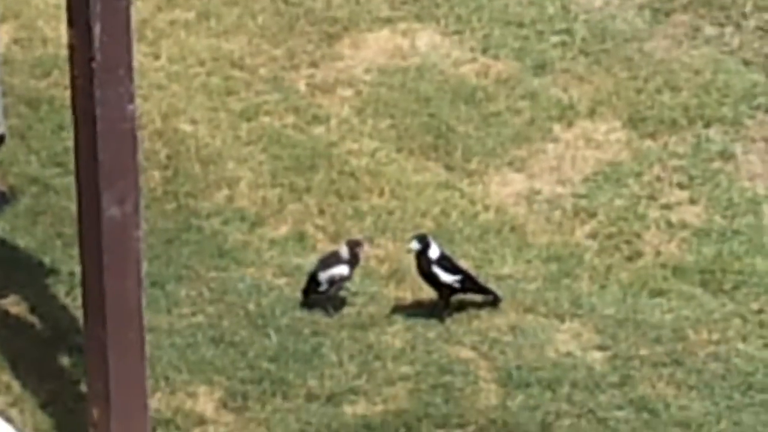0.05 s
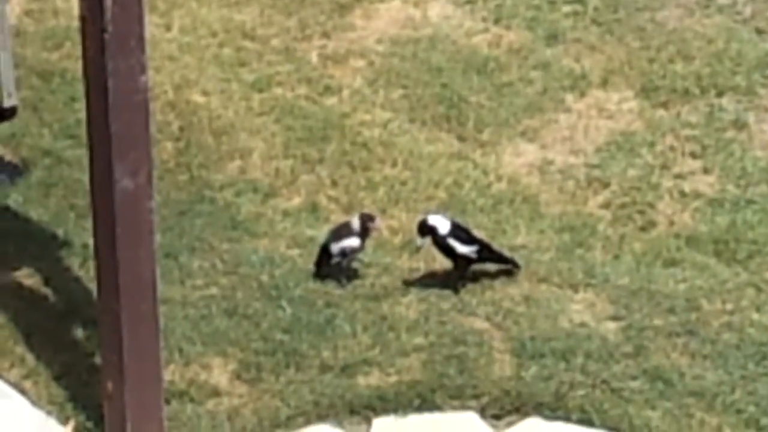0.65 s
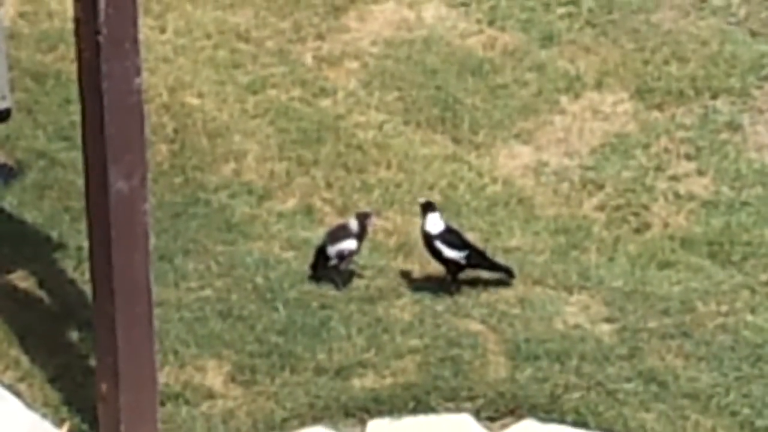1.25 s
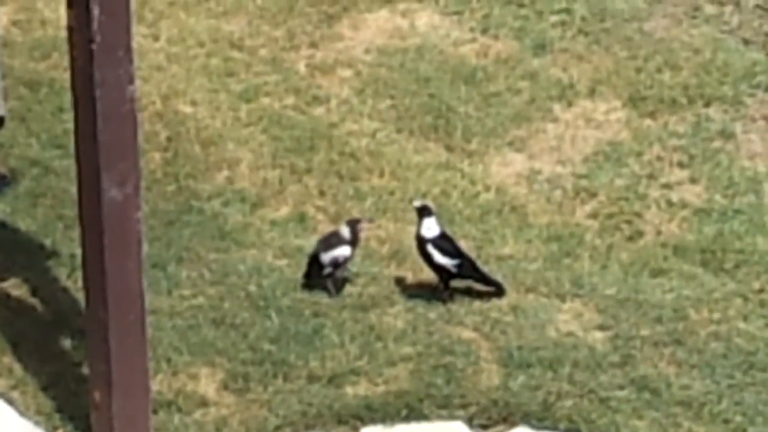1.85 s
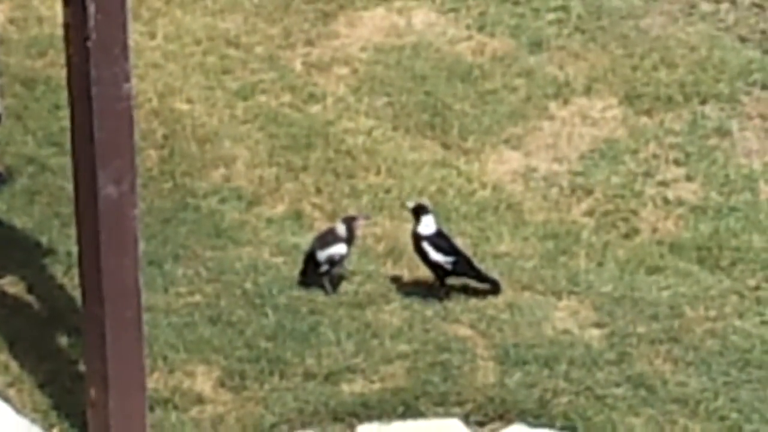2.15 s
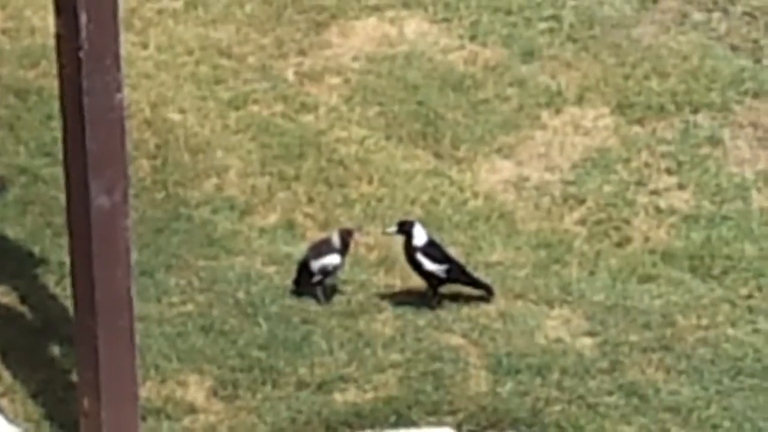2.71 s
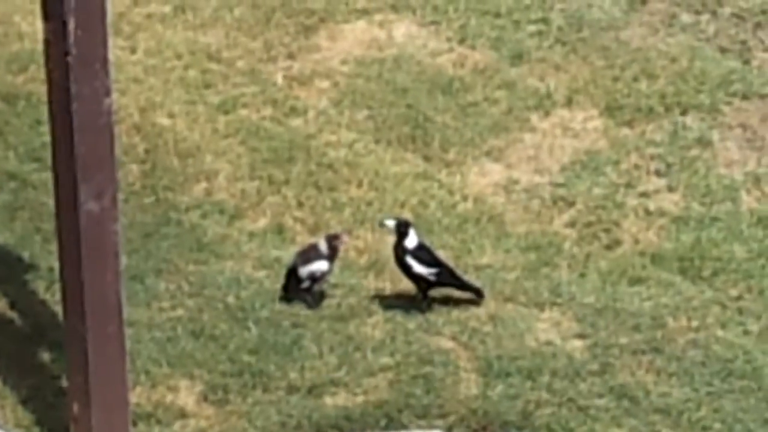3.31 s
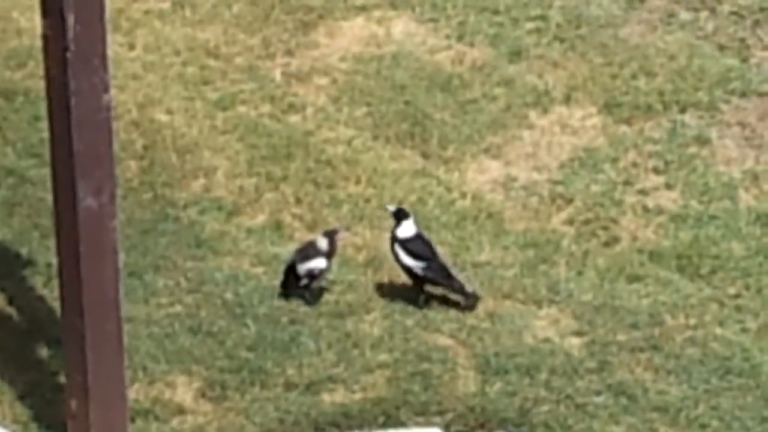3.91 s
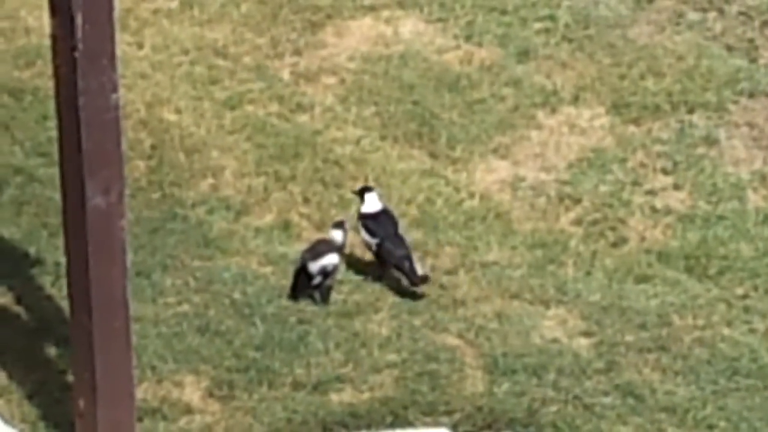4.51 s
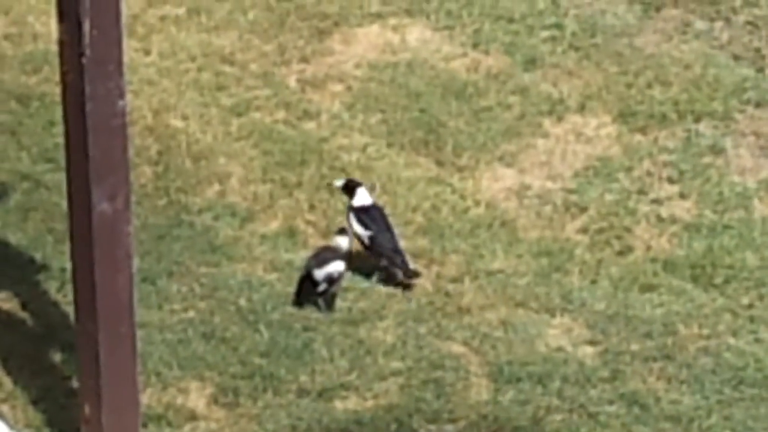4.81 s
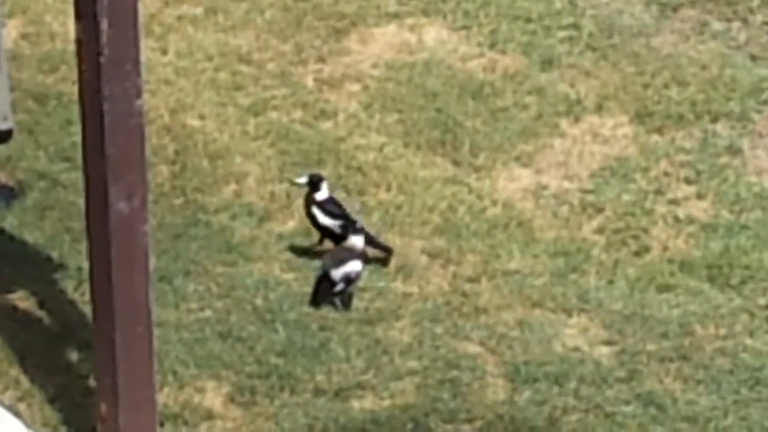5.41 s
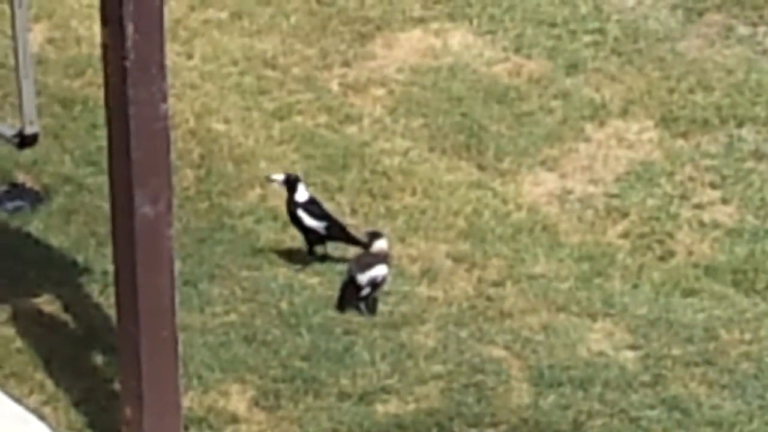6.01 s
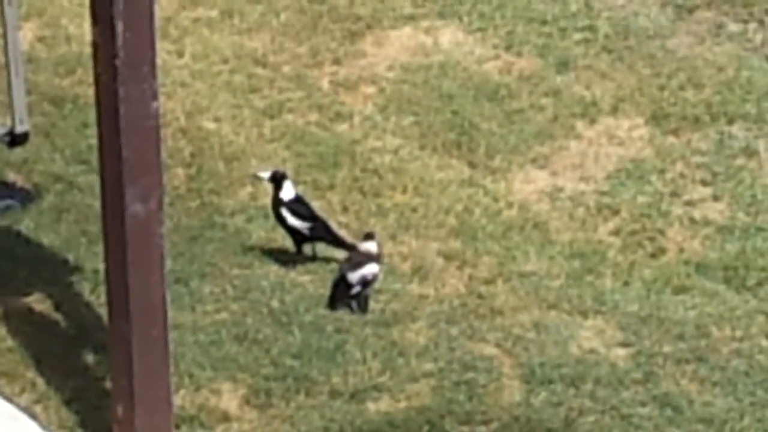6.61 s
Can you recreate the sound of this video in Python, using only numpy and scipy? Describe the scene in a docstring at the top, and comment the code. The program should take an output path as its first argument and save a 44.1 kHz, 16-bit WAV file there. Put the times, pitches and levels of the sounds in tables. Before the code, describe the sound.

Magpies give a run of short, nasal, rising begging whines in a backyard, with faint small birds and distant traffic hum.

```python
"""Young magpies begging on a back lawn

Each call is a nasal, climbing whine: harmonics from the syrinx, shaped by throat and beak, with air
pulsing in step. Two come from straight ahead, six from close on the right, five hoarser ones from
farther off on that side, and the house wall throws them back. Small birds chirp and whistle in the
distance over a soft hum of traffic and leaves; something knocks lightly nearby, once."""
import sys
import numpy as np
from scipy import signal
from scipy.fft import rfft, irfft, next_fast_len
from scipy.io import wavfile
from scipy.ndimage import map_coordinates

SR = 44100
rng = np.random.default_rng(int(sys.argv[2]) if len(sys.argv) > 2 else 0)


def transcribe(u):
    """Save the signal u as a 16-bit wav file named by the first command-line argument.

    u: samples, shape (n,) or (channels, n), limited to [-1, 1]; the rate is SR.
    q: integer samples, one column per channel.
    """
    v = np.clip(np.atleast_2d(u).T, -1, 1)
    q = np.round(v * 32767).astype(np.int16)
    wavfile.write(sys.argv[1], SR, q)


N = 297675
TIME = np.arange(N) / SR
LEFT_LAG_S = 0.00043   # sound from the right reaches the left side this much later

# air rushing through the syrinx of the two near magpies: f/Hz, level/dB
NEAR_AIR = [(500, -7), (1200, -19), (2400, 1), (3800, 2), (5000, -4), (6200, -35), (8000, 6), (11000, -8),
            (14500, -24)]
# stereo placement of scattered sound, mostly to the right: f/Hz, left minus right/dB
SCATTER_BALANCE = [(500, -47), (1100, 5.5), (2200, -22.5), (4000, -19.5), (8000, -31), (14000, -8)]


def from_db(db):
    """Decibels to gain."""
    return 10 ** (np.asarray(db) / 20)


def at_hz(points, hz):
    """Read a table of (f/Hz, value) on a log-frequency axis."""
    f, value = np.transpose(points)
    return np.interp(np.log(np.maximum(hz, 1)), np.log(f), value)


def colour(x, spectrum):
    """EQ a sound with a curve of (f/Hz, level/dB)."""
    size = next_fast_len(len(x) + SR // 20, real=True)
    gain = from_db(at_hz(spectrum, np.fft.rfftfreq(size, 1 / SR)))
    return irfft(rfft(x, size) * gain, size)[:len(x)]


def noise(spectrum, size):
    """Coloured noise of unit rms."""
    x = colour(rng.standard_normal(size), spectrum)
    return x / np.sqrt(np.mean(x ** 2) + 1e-20)


def drift(rate_hz, size):
    """Smooth random wander with a spread of about 1."""
    steps = np.arange(size) * rate_hz * 2 / SR
    return map_coordinates(rng.standard_normal(4096), [steps], order=3, mode="wrap")


def pan(x, balance):
    """Constant-power pan by a curve of (f/Hz, left minus right/dB)."""
    hz, lean_db = np.transpose(balance)
    right_db = 10 * np.log10(2 / (1 + from_db(lean_db) ** 2))
    return np.array([colour(side, np.c_[hz, db]) for side, db in zip(x, (right_db + lean_db, right_db))])


def add(out, start_s, sound):
    """Mix a sound in at its start time."""
    at = max(int(start_s * SR), 0)
    out[at:at + len(sound)] += sound[:N - at]


def delayed(x, delay_s):
    """The same sound, arriving later."""
    return np.interp(TIME - delay_s, TIME, x, left=0)


def voice_crack(t, crack_s, width_s=0.0091, lead_s=0.013):
    """The voice falters (a brief bump), then changes register (a smooth step from 0 to 1)."""
    falter = np.exp(-((t - crack_s + lead_s) / width_s) ** 2)
    register = .5 + .5 * np.tanh((t - crack_s) / width_s)
    return falter, register


def call_pitch(t, length, register, jump_hz, start_hz, top_hz, climb_s, bend, slope_hz_per_s):
    """A scoop, an ever steeper climb with a jump in it, a straight slope and a catch near the end."""
    catch_hz, catch_lead_s, catch_width_s = 37.1, 0.01743, 0.0067
    climb = start_hz + (top_hz - jump_hz - start_hz) * np.minimum(t / climb_s, 1) ** bend
    glide = climb + jump_hz * register + slope_hz_per_s * np.maximum(t - climb_s, 0)
    scoop = 1 - .14 * np.exp(-t / .011)
    catch = catch_hz * np.exp(-((length - t - catch_lead_s) / catch_width_s) ** 2)
    return glide * scoop - catch


def whine(call, body, throat, air, jitter, jitter_hz, shimmer_db, surge_db, air_db, hoarse,
          attack_s, release_s, arch_db, closing_db, crack_rough, crack_level_db, crack_step_db):
    """One call from the syrinx: a harmonic stack on a trembling pitch, with air that pulses in step."""
    length, *glide, crack_s, jump_hz, low_db, swell_db, octave_db, upper_db, dulling_db = call
    t = np.arange(0, length, 1 / SR)
    size = len(t)
    along = 2 * t / length - 1   # from -1 at the start to 1 at the end
    falter, register = voice_crack(t, crack_s)
    pitch = call_pitch(t, length, register, jump_hz, *glide)
    # the syrinx beats unevenly while it is slack or cracking, and steadies as it tightens
    slack = 1 + hoarse * np.clip((1250 - pitch) / 300, 0, 1) + crack_rough * falter
    trembling_hz = pitch * (1 + jitter * slack * drift(jitter_hz, size))
    phase = 2 * np.pi * np.cumsum(trembling_hz) / SR
    orders = np.arange(1, 19)[:, None]
    hz = orders * pitch
    # the low partials slide through the body's peaks; the third and fourth fade as the call closes
    first, second, third, fourth = at_hz(body, hz[:4]) + low_db
    closing = closing_db * np.maximum(along, 0) ** 2
    low = from_db([first, second + octave_db, third - closing, fourth - closing])
    # the upper partials flare in the throat's resonances; together they arch and dull along the call
    upper = from_db(at_hz(throat, hz[4:]))
    upper_rms = np.sqrt(np.mean(np.sum(upper ** 2, axis=0)))
    upper *= from_db(upper_db - dulling_db * along / 2 - arch_db * along ** 2) / upper_rms
    heights = np.vstack([low, upper]) * (hz < .45 * SR)
    # each partial shimmers quickly and surges slowly on its own
    flutter = from_db([shimmer_db * drift(70.14, size) + surge_db * drift(21.78, size) for _ in orders])
    bloom = from_db(-8 * np.exp(-t / .012) * (orders > 2))   # overtones open a moment late
    offsets = rng.uniform(0, 2 * np.pi, orders.shape)
    tone = np.sqrt(2) * np.sum(heights * flutter * bloom * np.sin(orders * phase + offsets), axis=0)
    # the harder the bird presses, the more upper partials and the more air
    effort = np.sqrt(np.sum(heights[2:] ** 2, axis=0))
    hiss = from_db(air_db) * np.sqrt(slack) * effort * noise(air, size) * (1 + .5 * np.cos(phase))
    gate = np.clip(np.minimum(t / attack_s, (length - t) / release_s), 0, 1)
    level_db = swell_db * along / 2 + crack_step_db * (register - .5) + crack_level_db * falter
    return (tone + hiss) * gate * from_db(level_db)


def magpie(calls, body, throat, air, **voice):
    """A run of begging calls in one voice."""
    # calls: t/s, length/s, start f/Hz, top f/Hz, climb/s, bend (1 = straight), later slope/(Hz/s),
    #   time to the crack/s, jump/Hz, low partials/dB, swell/dB, octave boost/dB,
    #   upper partials/dB, their fall/dB
    # body: peaks and hollows of throat, beak and ground bounce, on the four low partials
    # throat: resonances on the partials above those
    out = np.zeros(N)
    for start_s, *call in calls:
        add(out, start_s, whine(call, body, throat, air, **voice))
    return out


def lawn_magpie():
    """The bird straight ahead: the steadiest pitch and a quick attack."""
    calls = [(0, 0.18, 993, 1212, 0.156, 2.87, -1157, 0.097, 19, -28, 6.8, 0.3, -32.5, 9.1),
             (0.385, 0.24, 824, 1234, 0.203, 1.71, 645, 0.108, 39.2, -31, 11, 0.0, -35, 17.7)]   # two whines, columns as in magpie()
    body = [(830, -6), (1000, -19), (1200, -18.1), (1700, -7), (2100, -15), (2550, -25), (2950, -3.5),
            (3080, -17.5), (3520, -0.9), (3800, -6), (4020, 0.5), (4300, -9), (4900, -5)]   # low-partial EQ: f/Hz, level/dB
    throat = [(3800, 4), (4700, 1), (5300, 3), (5900, -2), (7100, -1), (8000, -13), (9000, -8),
              (10500, -15), (12000, -15), (14500, -25)]   # upper-partial EQ: f/Hz, level/dB
    return magpie(calls, body, throat, NEAR_AIR, jitter=0.0033, jitter_hz=286,
                  shimmer_db=2.5, surge_db=2.5, air_db=-16.0, hoarse=0.35,
                  attack_s=0.006, release_s=0.049, arch_db=2.5, closing_db=8.5,
                  crack_rough=0.88, crack_level_db=0, crack_step_db=4.5)


def suburb_hum(shared, level_db):
    """Distant traffic and leaves: steady noise, with a share of its power common to both sides."""
    spectrum = [(15, -47), (25, -27.5), (124, -5), (716, -11), (862, -14), (934, -13.5), (1070, -15.5),
                (1720, -17), (2440, -18), (2940, -19), (3440, -21.5), (4260, -22.5), (6880, -26),
                (7860, -23), (14500, -26.5)]   # bass-heavy hum: f/Hz, level/dB
    balance = [(60, 10), (120, 7.5), (370, 1), (700, -1.5), (1300, -3.5), (2400, -6), (4500, -4.5),
               (8000, -4.5), (14000, 2)]   # placement: f/Hz, left minus right/dB
    centre = np.sqrt(shared) * noise(spectrum, N)
    sides = np.sqrt(1 - shared) * np.array([noise(spectrum, N), noise(spectrum, N)])
    return from_db(level_db) * pan(centre + sides, balance)


def chorus(bed_db=-58, fade_db_per_s=1.7, flicker_db=1.2):
    """Birds too far off to tell apart merge into a wash that swells as more join in."""
    spectrum = [(1400, -50), (2200, -1.5), (3300, 2.5), (4300, 2.5), (5500, -16), (7500, -6.5),
                (10000, -19)]   # colour of the wash: f/Hz, level/dB
    swells = [(4.15, 0.32, -55), (4.78, 0.16, -54.5), (5.19, 0.11, -49), (5.95, 0.066, -56.5),
              (6.42, 0.25, -60.5)]   # its surges: peak t/s, half width/s, level/dB
    bed_power = from_db(bed_db - fade_db_per_s * TIME) ** 2
    swell_power = sum(from_db(db) ** 2 * np.exp(-((TIME - s) / width) ** 2) for s, width, db in swells)
    level = np.sqrt(bed_power + swell_power) * from_db(flicker_db * drift(14, N))
    return pan(level * np.array([noise(spectrum, N), noise(spectrum, N)]), SCATTER_BALANCE)


def bird_notes(notes, bend, waver, waver_hz):
    """Wavering sine glides that swell and fade; a bend above 1 speeds up, one below 1 slows down."""
    out = np.zeros(N)
    for start_s, length, start_hz, end_hz, level_db in notes:
        along = np.linspace(0, 1, int(length * SR))
        glide = start_hz + (end_hz - start_hz) * along ** bend
        hz = glide * (1 + waver * drift(waver_hz, len(along)))
        swell = np.sqrt(2) * np.abs(np.sin(np.pi * along)) ** 0.46
        add(out, start_s, from_db(level_db) * swell * np.sin(2 * np.pi * np.cumsum(hz) / SR))
    return out


def whistles():
    """Birds in distant gardens whistle slow glides."""
    notes = [(0.07, 0.16, 2970, 2204, -51.5), (0.655, 0.064, 3100, 3210, -56),
             (3.225, 0.134, 2365, 2650, -57.5), (3.85, 0.22, 3190, 3710, -63),
             (4.68, 0.14, 3000, 3500, -59), (5.065, 0.07, 3610, 3310, -46), (5.10, 0.25, 2505, 3030, -57.5)]   # glides: t/s, length/s, start f/Hz, end f/Hz, level/dB
    return bird_notes(notes, bend=0.79, waver=0.0157, waver_hz=163.5)


def knock(start_s=0.464, gain_db=-30.5):
    """A light, close knock: quickly damped modes of something too small to radiate bass."""
    modes = [(234, -15, 0.029), (355, 0, 0.013), (500, -9, 0.016), (870, 0, 0.0096), (1360, -2, 0.0043)]   # resonances: f/Hz, level/dB, t60/s
    out, t = np.zeros(N), TIME[:SR // 10]
    ring = sum(from_db(gain_db + db - 60 * t / t60) * np.sin(2 * np.pi * hz * t) for hz, db, t60 in modes)
    add(out, start_s, ring)
    return signal.sosfilt(signal.butter(2, 200, "high", fs=SR, output="sos"), out)


def chirps(length_s=0.038, flick_ratio=1.3, chip_ratio=0.51):
    """One small bird flicks thinly upward; another answers with lower, falling chips."""
    flicks = [(0.845, 5750, -62), (1.585, 5300, -53.5), (3.45, 5250, -61), (4.10, 5620, -45),
              (4.665, 5480, -62), (5.207, 5080, -50), (5.887, 5000, -56), (6.485, 5330, -62)]   # rising notes: t/s, start f/Hz, level/dB
    chips = [(5.137, 4390, -48.5), (5.93, 3450, -58), (5.963, 4100, -58), (6.31, 3450, -51.5),
             (6.368, 4000, -56)]   # falling notes: t/s, start f/Hz, level/dB
    rising = [(s, length_s, hz, hz * flick_ratio, db) for s, hz, db in flicks]
    falling = [(s, length_s, hz, hz * chip_ratio, db) for s, hz, db in chips]
    return bird_notes(rising + falling, bend=1.4, waver=0.018, waver_hz=211)


def right_magpie():
    """The bird close on the right: soft-edged calls that flare as the voice cracks."""
    calls = [(0.905, 0.34, 836, 1190, 0.18, 2.03, 1654, 0.13, 6, -30.5, 3.5, 0, -40, 6.8),
             (1.305, 0.26, 971, 1259, 0.15, 1.39, 1243, 0.12, 19, -30, -6, -1.2, -43, 6.6),
             (1.855, 0.3, 1005, 1340, 0.14, 2.06, 989, 0.074, 28, -30.5, 5.5, 1.1, -45.5, 11),
             (2.315, 0.39, 873, 1406, 0.36, 1.23, -210, 0.13, -11.5, -29.5, 6.5, 0.5, -41.5, 7.3),
             (2.845, 0.25, 1161, 1423, 0.192, 1.9, 1036, 0.095, 28, -31, -1.7, 1.1, -46.5, 15.4),
             (3.515, 0.31, 926, 1352, 0.16, 1.93, 987, 0.079, 18, -30.5, 12.5, 6.5, -44.5, 17.7)]   # six whines, columns as in magpie()
    body = [(850, -4.5), (1020, -20), (1250, -14.5), (1390, -11.5), (1500, -16), (1700, -9), (2100, -20.5),
            (2550, -20.5), (2880, -14.5), (3100, -17.5), (3520, -2), (3800, -11), (4050, -8), (4550, -11),
            (5000, -6.5), (5500, -19)]   # low-partial EQ: f/Hz, level/dB
    throat = [(3800, -4), (5100, 4), (5700, -6.5), (6200, -12.5), (7100, -3), (8500, -9), (10000, -12),
              (12000, -16.5), (14500, -28)]   # upper-partial EQ: f/Hz, level/dB
    return magpie(calls, body, throat, NEAR_AIR, jitter=0.0045, jitter_hz=298,
                  shimmer_db=1.5, surge_db=1.82, air_db=-19.5, hoarse=0.74,
                  attack_s=0.024, release_s=0.064, arch_db=3.0, closing_db=7.0,
                  crack_rough=0.97, crack_level_db=4.5, crack_step_db=4.0)


def rasp():
    """At the start of one call the voice breaks into noise before it settles."""
    envelope = [(2.304, -56), (2.33, -43), (2.37, -44), (2.405, -38.5), (2.44, -49), (2.47, -68)]   # hoarse burst: t/s, level/dB
    spectrum = [(700, -39), (1100, -12), (1400, -13), (1750, -9), (2100, -25), (3000, -36)]   # its midrange colour: f/Hz, level/dB
    times, level_db = np.transpose(envelope)
    return from_db(np.interp(TIME, times, level_db, left=-150, right=-150)) * noise(spectrum, N)


def far_magpie():
    """The bird farther off: short, hoarse, breathy calls."""
    calls = [(4.025, .24, 936, 1202, 0.13, 1.44, 1895, 0.14, 115, -33.5, 11.2, -0.75, -47.5, 12),
             (4.403, 0.16, 968, 1344, 0.14, 1.44, -200, 0.047, 0, -35, 8.6, -0.58, -56, 32),
             (4.855, .155, 843, 1254, 0.12, 2.03, 500, 0.091, 68, -38, 5.4, 1, -55.5, 29),
             (5.61, .175, 846, 1294, .146, 2.74, -1600, .118, 111, -35.5, 1.3, -1.6, -46, 18),
             (6.055, 0.17, 869, 1309, 0.13, 1.58, 875, 0.075, 14, -36, 11.3, 0.3, -52.5, 8.8)]   # five whines, columns as in magpie()
    body = [(850, -10.5), (1050, -18.5), (1320, -18.5), (1680, -3.5), (2200, -5.5), (2550, -13),
            (2900, -12.5), (3120, -25), (3550, -8.5), (4050, -11.5), (4500, -15), (5050, -16.5),
            (5400, -25)]   # low-partial EQ: f/Hz, level/dB
    throat = [(3800, 7), (5000, -0.5), (5500, -4), (6200, -21.5), (7500, -13), (10000, -21.5), (14500, -67)]   # upper-partial EQ: f/Hz, level/dB
    air = [(500, -28), (1200, 7), (2200, -8), (4000, 1), (6000, 0.5), (8000, -5), (14500, -42)]   # air through the syrinx: f/Hz, level/dB
    return magpie(calls, body, throat, air, jitter=0.0085, jitter_hz=348,
                  shimmer_db=3.5, surge_db=1.6, air_db=-14.5, hoarse=0.93,
                  attack_s=0.0095, release_s=0.021, arch_db=8.5, closing_db=0.5,
                  crack_rough=2.1, crack_level_db=0, crack_step_db=4.0)


def yard_tail():
    """Scatter from fences and trees: noise that dies sooner in the treble, different on each side."""
    spectrum = [(500, 3.5), (1200, -3), (2600, 7), (4200, -1), (7000, 3), (14000, 4)]   # reverb EQ: f/Hz, level/dB
    decay_times = [(500, 0.56), (3000, 0.36), (7000, 0.35), (14000, 0.38)]   # reverb decay: f/Hz, t60/s
    t, edges = TIME[:SR * 3 // 4], np.geomspace(300, 16000, 8)
    onset = 1 - np.exp(-t / 0.0012)
    out = 0
    for low, high in zip(edges, edges[1:]):
        bandpass = signal.butter(2, [low, high], "band", fs=SR, output="sos")
        band = signal.sosfilt(bandpass, rng.standard_normal((2, len(t))))
        hz = np.sqrt(low * high)
        decay = from_db(-60 * t / at_hz(decay_times, hz)) * onset
        out = out + band * decay / np.sqrt(np.sum(decay ** 2)) * from_db(at_hz(spectrum, hz))
    return out


def yard(x, balance, scatter_balance, lag_s, direct_db, echo_db, tail_db):
    """The straight path reaches the nearer side first; wall echoes and a diffuse tail follow."""
    reflections = [(.011, -22), (.0267, -15), (.0283, -15)]   # slaps off the house wall: delay/s, level/dB
    wall_eq = [(1000, -4), (3500, -2), (5200, 1), (7000, 8), (14000, 8)]   # the wall returns the beamed treble best: f/Hz, level/dB
    direct = pan([delayed(x, lag_s), x], balance)
    bright = colour(x, wall_eq)
    echoes = 0
    for delay_s, db in reflections:
        side_lags = rng.uniform(0, LEFT_LAG_S, 2)
        echoes = echoes + from_db(db) * np.array([delayed(bright, delay_s + lag) for lag in side_lags])
    tail = signal.fftconvolve(x[None], yard_tail(), axes=1)[:, :N]
    scatter = pan(from_db(echo_db) * echoes + from_db(tail_db) * tail, scatter_balance)
    return from_db(direct_db) * direct + scatter


def scene():
    """Three magpies in the yard, over the sounds of the neighbourhood."""
    centred = [(500, 0.42), (4000, -0.072), (8000, 0.37)]   # almost even placement: f/Hz, left minus right/dB
    shaded = [(500, 26), (1100, -10), (2200, -16.5), (4000, -38), (8000, -23), (14000, -24)]   # treble from the right is shaded on the left: f/Hz, left minus right/dB
    ahead, on_right = (centred, centred, 0), (shaded, SCATTER_BALANCE, LEFT_LAG_S)
    lawn, right, far = lawn_magpie(), right_magpie(), far_magpie()
    small_birds = chirps() + whistles()
    return (yard(lawn, *ahead, direct_db=-3.0, echo_db=4.5, tail_db=-8)
            + yard(right + rasp(), *on_right, direct_db=1.5, echo_db=1.0, tail_db=-7.0)
            + yard(far, *on_right, direct_db=2.5, echo_db=4.0, tail_db=-5.0)
            + yard(small_birds, *on_right, direct_db=3.5, echo_db=-17, tail_db=-2.5)
            + chorus()
            + knock() * from_db([[3], [-10.5]])   # well to the left
            + suburb_hum(shared=0.13, level_db=-52.5))


def record(dry):
    """A steep low-pass takes off the very top."""
    cutoff_hz = 14600
    return signal.sosfilt(signal.ellip(12, .1, 80, cutoff_hz, fs=SR, output="sos"), dry)


dry = scene()
out = record(dry)
transcribe(out)
```